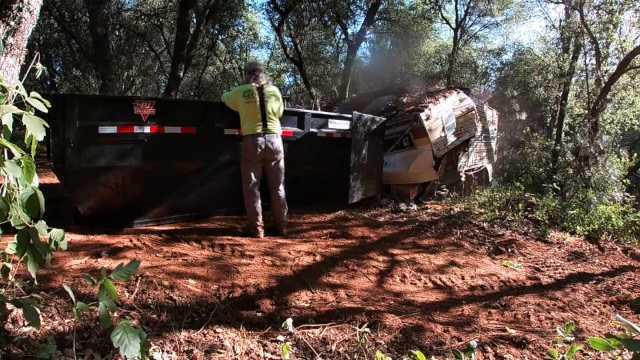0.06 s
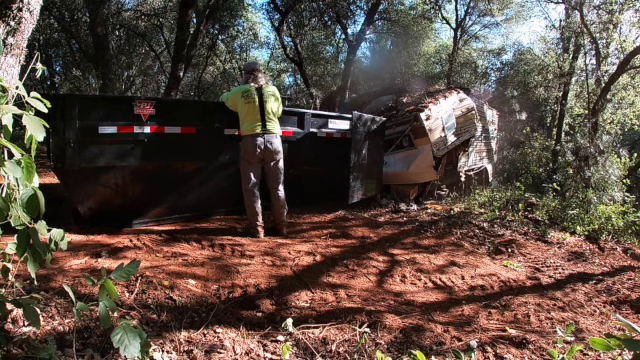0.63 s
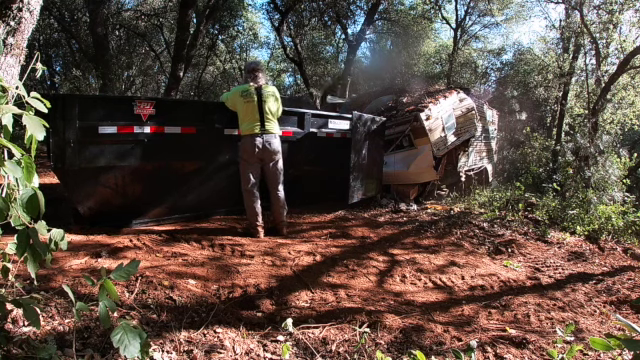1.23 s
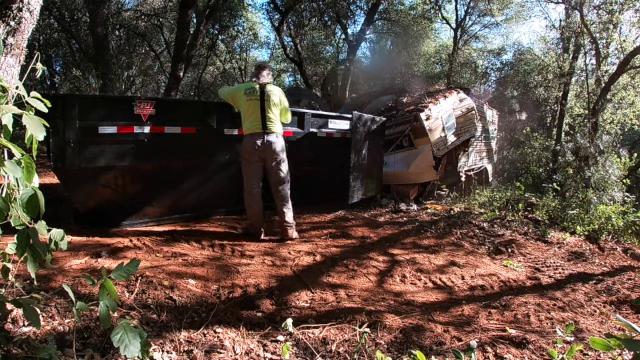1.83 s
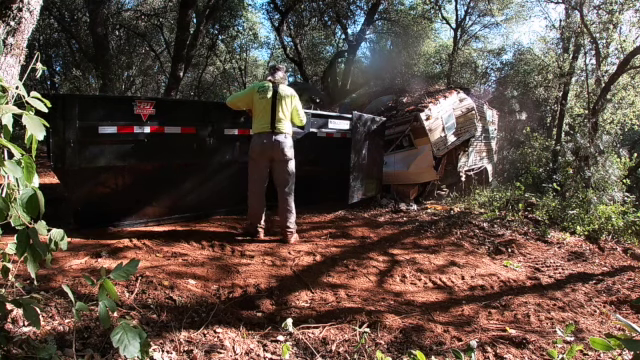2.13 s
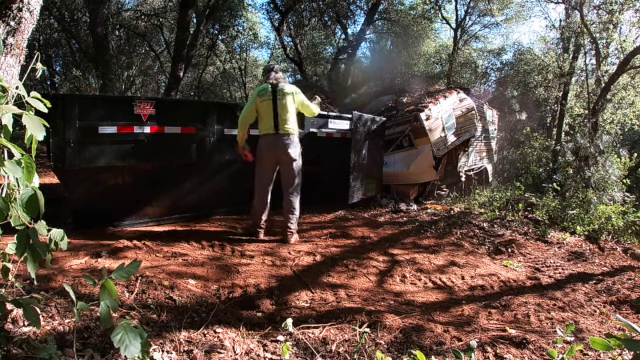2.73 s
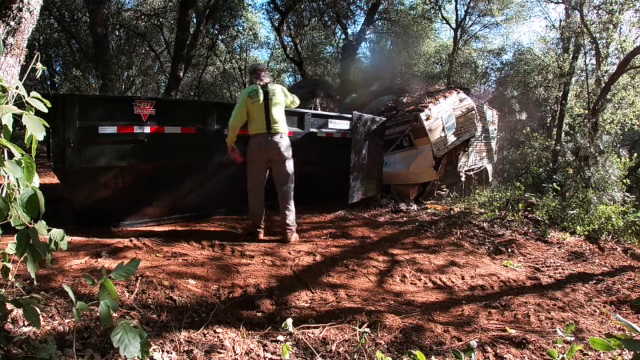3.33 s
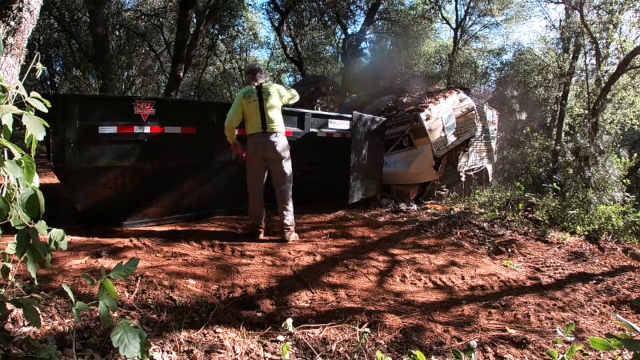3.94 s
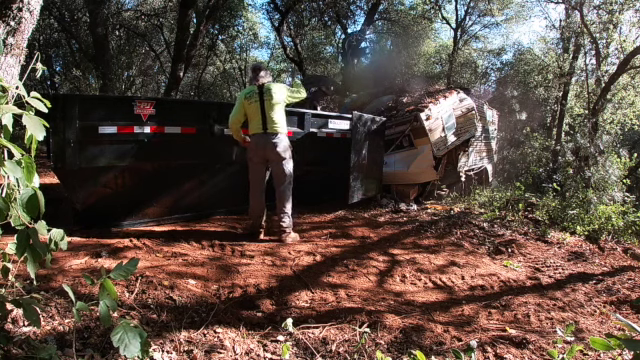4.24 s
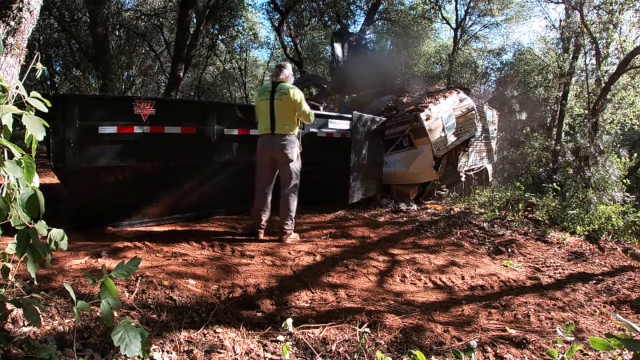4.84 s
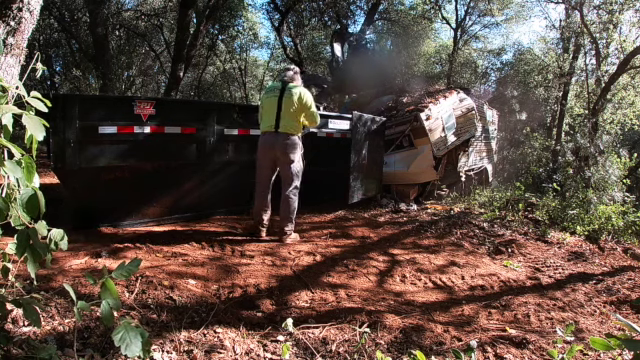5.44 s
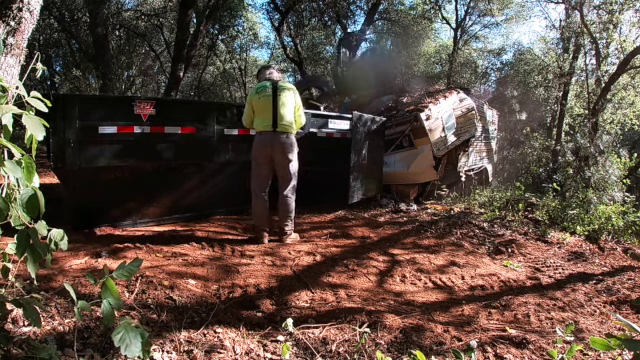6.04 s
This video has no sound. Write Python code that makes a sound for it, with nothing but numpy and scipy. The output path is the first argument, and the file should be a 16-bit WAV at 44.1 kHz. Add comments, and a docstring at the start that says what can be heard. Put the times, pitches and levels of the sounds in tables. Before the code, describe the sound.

The low, even drone of an excavator's diesel engine fills a wooded clearing, with soft hydraulic whines coming and going. A camper breaks up under it in separate bursts: small crunches and one sharp snap, then tearing timber and a wall caving in with a faint groan, and finally a run of crunching panels. Each break echoes briefly among the trees.

```python
"""In a forest clearing, a four-cylinder diesel excavator at working speed crushes a camper body.
Its exhaust booms at the firing rate, over an engine growl, diesel clatter and whining hydraulics.
Wooden studs crack, the timber frame tears, sheet panels crunch, walls cave in and the shell groans.
Most breaks are bursts of tiny snaps that make the wreck ring; the trees scatter every break."""
import sys
import numpy as np
from scipy import signal
from scipy.fft import rfft, irfft, next_fast_len
from scipy.io import wavfile
from scipy.ndimage import map_coordinates

SR = 44100
rng = np.random.default_rng(int(sys.argv[2]) if len(sys.argv) > 2 else 0)


def store_wav(level_fs):
    """Save 16-bit WAV to argv[1]."""
    pcm = np.round(np.clip(np.atleast_2d(level_fs), -1, 1) * 32767)
    wavfile.write(sys.argv[1], SR, pcm.T.astype(np.int16))


N = 272229


def amp(db):
    """Turn decibels into a gain."""
    return 10 ** (np.asarray(db) / 20)


def unit(x):
    """Scale a signal to an average (rms) level of 1."""
    return x / np.sqrt(np.mean(x ** 2) + 1e-20)


def along(points, hz):
    """Read between (Hz, value) points on a logarithmic frequency scale."""
    freqs, values = np.transpose(points)
    return np.interp(np.log(hz + 1), np.log(freqs), values)


def curve(points):
    """Join (seconds, value) points with straight lines, one value per sample."""
    return np.interp(np.arange(N) / SR, *np.transpose(points))


def wobble(rate):
    """A smooth curve through `rate` random points a second."""
    points = rng.standard_normal(int(N * rate / SR) + 4)
    return map_coordinates(points, [np.arange(N) * rate / SR])


def filtered(x, response):
    """Scale each frequency in x by the gain response(hz)."""
    size = next_fast_len(N + 8192)
    return irfft(rfft(x, size) * response(np.fft.rfftfreq(size, 1 / SR)), size)[:N]


def noise(spectrum, swell):
    """Noise shaped by (Hz, dB) points, growing and shrinking with `swell`; average level 1."""
    steady = filtered(rng.standard_normal(N), lambda hz: amp(along(spectrum, hz)))
    return unit(steady * np.exp(swell))


def add(out, start_s, sound):
    """Mix a sound in at a given time."""
    start = max(round(start_s * SR), 0)
    out[start:start + len(sound)] += sound[:max(N - start, 0)]


def exhaust(phase, firing_hz, load, pipe_hz=70.3):
    """The silencer leaves an almost pure tone at the firing rate; load brings out its octave."""
    detune_db = 1.25 * np.maximum(firing_hz - pipe_hz, 0)  # weaker above the pipe's tuning
    boom = amp(-12.7 - 0.65 * load - detune_db + 0.062 * wobble(14)) * np.cos(phase)
    octave_db = -54.5 + 15.5 * load + 0.49 * wobble(18)
    octave = amp(octave_db) * np.sin(2 * phase + rng.uniform(0, 2 * np.pi))
    return np.sqrt(2) * (boom + octave)


def growl(phase, load, boost_db=0.57, waver_db=1.5):
    """Unequal cylinders give tones at quarter steps of the firing rate; gears add a few more."""
    # Each row: multiple of the firing rate, relative dB at light load, relative dB at full load.
    tones = [(1.5, -57, -55), (3, -60, -58), (3.63, -62, -58), (4, -62, -66), (5.1, -69, -56),
             (5.44, -57.5, -55), (6.06, -56, -61), (7, -69, -57), (7.25, -67, -61), (7.5, -59, -54),
             (7.75, -63, -57), (8, -80, -58), (9, -64, -61), (8.5, -66, -64), (8.75, -62, -63),
             (9.75, -63, -66), (12, -72, -75), (13.5, -67.5, -66.5)]
    out = np.zeros(N)
    for multiple, light_db, full_db in tones:
        db = light_db + (full_db - light_db) * load + boost_db + waver_db * wobble(5.5)
        out += amp(db) * np.sin(multiple * phase + rng.uniform(0, 2 * np.pi) + 0.16 * wobble(11))
    return np.sqrt(2) * out


def engine_noise(phase, load):
    """The casing rumbles and the diesel clatters in time with the engine; load adds knock."""
    # The tone colours of the three noises. Each row: frequency in Hz, relative level in dB.
    casing_colour = [(20, -3.5), (50, -6), (100, 3.5), (135, 4.5), (175, -4.5), (280, -7), (430, -3.5),
                     (600, -8.5), (800, -11), (1100, -23), (2000, -36.5), (4000, -81)]
    clatter_colour = [(300, -28.5), (700, -1.5), (1000, 0.5), (1300, -2), (1550, -0.5), (1950, -3),
                      (2300, 1), (3000, -3), (3700, -10), (5800, -10), (7400, -12.5), (8100, -22),
                      (9000, -19.5), (11000, -39.5), (13000, -54)]
    knock_colour = [(400, -15), (950, -2.5), (1700, -4), (2300, -12), (5000, -30.5), (10000, -70.5)]
    # One swell per firing, one per shaft turn and one per four-stroke cycle.
    beat = 0.21 * np.cos(phase) + 0.13 * np.cos(phase / 2) + 0.01 * np.cos(phase / 4)
    rumble = amp(-46 + 3.5 * load + 0.22 * wobble(11)) * noise(casing_colour, beat)
    clatter = amp(-53 - load + 0.042 * wobble(23)) * noise(clatter_colour, 0.18 * beat)
    knock = amp(-57) * load * noise(knock_colour, beat)
    return rumble + clatter + knock


def pump(phase, waver_db=1.2):
    """The hydraulics whine in step with the engine, swelling and fading with each move of the arm."""
    # Each row: start, length and fade in seconds, multiple of the firing rate, level in dB,
    # flutter in radians.
    whines = [(-.6, 3.8, .7, 8, -52, .22), (-.1, 1.2, .3, 6, -50, .5), (1.1, .8, .3, 6, -52, .6),
              (0, 1.0, .42, 12, -57, .45), (1.9, .8, .35, 8.5, -54.5, .4), (2.15, 1.4, .5, 9, -54.8, .35),
              (2.7, .8, .3, 10, -60, .4), (2.7, .85, .25, 22, -66, 1.1), (3.15, .5, .15, 6, -54.5, .4),
              (3.9, .95, .3, 9, -56, .35), (4.1, .8, .3, 8, -55, .4), (4.7, 1.3, .15, 7, -55.5, .35),
              (5.5, .7, .25, 12, -56.5, .35), (5.65, .8, .3, 8, -54, .4)]
    t, out = np.arange(N) / SR, np.zeros(N)
    for start, length, fade, multiple, db, flutter in whines:
        swell = np.clip(np.minimum(t - start, start + length - t) / fade, 0, 1)
        cycle = multiple * phase + rng.uniform(0, 2 * np.pi) + flutter * wobble(19)
        out += swell * amp(db + waver_db * wobble(14)) * np.sin(cycle)
    return np.sqrt(2) * out


def ring(spectrum, bright_db, peaks=(), size=2048):
    """How a part rings after one tap. Each peak: pitch in Hz, height in dB, half width in octaves."""
    hz = np.fft.rfftfreq(size, 1 / SR)
    peaks_db = sum(db / (1 + (np.log2((hz + 1) / centre) / width) ** 2) for centre, db, width in peaks)
    tilt_db = bright_db * np.log2(np.maximum(hz, 700))
    cepstrum = irfft(np.log(amp(along(spectrum, hz) + tilt_db + peaks_db)))
    # Folding this onto its first half keeps the tone colour and puts all ringing after the tap.
    cepstrum[1:size // 2] *= 2
    cepstrum[size // 2 + 1:] = 0
    response = irfft(np.exp(rfft(cepstrum)))
    return response / np.linalg.norm(response)


def fracture(length, bright_db, piece_peaks, thud_db, first_snap, fibres_per_s=1100, ring_s=0.015):
    """One snap, then a run of fibres giving way: they ring the piece and wreck and shake the panel."""
    # The tone colours of splintering and of a panel's thud. Each row: frequency in Hz, relative dB.
    splinter_colour = [(150, -14), (500, -0.5), (900, -1), (1300, -1), (1700, 0), (2050, -5), (2450, -2.5),
                       (2900, -3), (3900, -6.5), (4700, -9.5), (6000, -10), (7300, -13), (8000, -21),
                       (9500, -24.5), (11500, -40), (15000, -52.5)]
    thud_colour = [(60, -29.5), (140, 3.5), (290, 4), (480, -1.5), (780, -5), (1200, -12), (2200, -22),
                   (6000, -57)]
    # The wreck's own resonances. Each row: pitch in Hz, height in dB.
    wreck_modes = [(1200, 1.5), (2680, 1.5), (5300, 1.5), (7000, 1), (8700, 2.5)]
    t = np.arange(SR // 4) / SR
    gives_way = (rng.random(len(t)) < fibres_per_s / SR) & (t < length)
    snaps = gives_way * amp(4 * rng.standard_normal(len(t))) * rng.choice([-1, 1], len(t))
    snaps[0] = first_snap
    peaks = [(hz, db, 0.093) for hz, db in wreck_modes] + piece_peaks
    body = ring(splinter_colour, bright_db, peaks) + amp(thud_db) * ring(thud_colour, 0)
    sound = signal.fftconvolve(signal.fftconvolve(snaps, body), scatter())
    energy = (length + ring_s) * SR * np.sum(body ** 2)  # a longer tear releases more energy
    return sound * np.sqrt(energy / np.sum(sound ** 2))


def studs(rise_s=0.00047, tip_fade_s=0.0069, scatter_db=-11):
    """A wooden stud parts all at once: its tip splinters and it rings for a few milliseconds."""
    # Each row: start in seconds, relative level in dB, brightness in dB per octave.
    cracks = [(1.2875, -18.5, -1), (1.673, -44.5, 9), (3.6102, -23, 2), (3.7328, -29, 6)]
    # A stud's ringing tones. Each row: pitch in Hz, relative level in dB, seconds to fade by 60 dB.
    stud_modes = [(2750, -12.5, .008), (3830, -6, 0.0069), (5760, -2, 0.0073), (6460, -3.5, 0.0064),
                  (8800, -25.5, 0.0045)]
    t, out = np.arange(SR // 20) / SR, np.zeros(N)
    for start, db, bright_db in cracks:
        ringing = np.zeros(len(t))
        for hz, mode_db, fade_s in stud_modes:
            decay = amp(mode_db + bright_db * np.log2(hz / 5800) - 60 * t / fade_s)
            ringing += decay * np.sin(2 * np.pi * (hz * t + rng.random()))
        tip = amp(-12.5 - 60 * t / tip_fade_s) * rng.standard_normal(len(t))
        tip = signal.lfilter(*signal.butter(2, 7000, fs=SR), tip)
        crack = amp(db) * (ringing + tip) * (1 - np.exp(-t / rise_s))
        add(out, start, crack)
        add(out, start, amp(scatter_db) * signal.fftconvolve(crack, scatter()))
    return out


def framing(spray_delay_s=0.015, spray_s=0.06, spray_db=-18.5, octaves=0.31):
    """Timber tears fibre by fibre, and a spray of splinters follows; thin pieces give off no bass."""
    # Each row: start in seconds, level in dB, tearing time in seconds, brightness in dB per octave,
    # the piece's resonance in Hz, its height in dB, bass cutoff in Hz.
    tears = [(0.191, -50, 0.059, 1, 3300, 2, 500), (1.177, -53, 0.0039, 5.5, 9000, 13.5, 6000),
             (1.18, -43, 0.013, -0.5, 2970, 7, 2500), (1.251, -56.5, 0.0053, -5, 2470, 8, 1500),
             (1.289, -36.5, 0.018, 0.2, 4900, 6, 600), (1.316, -47, .03, 0, 5200, 6, 1000),
             (1.345, -54, 0.057, 1, 5200, 8, 2000), (1.673, -55.5, 0.006, 9, 10500, 4.5, 2500),
             (1.713, -49, 0.04, 0, 6900, 8, 600), (2.12, -60.5, .007, 6, 10900, 5.5, 2500),
             (2.378, -48.5, 0.019, 0.5, 4000, 2.5, 600), (2.523, -53, 0.0089, 2, 9150, 5, 800),
             (3.612, -40, 0.0095, -1, 2610, 3.5, 500), (3.622, -38.3, 0.043, 3, 7000, 0.5, 500),
             (3.685, -46.5, 0.049, 2, 4170, 3.5, 800), (3.733, -33.5, 0.013, 3.5, 5950, 5, 800),
             (3.738, -35, 0.018, 0, 2810, 8, 900), (3.92, -51, 0.099, -1.5, 6000, 3.5, 500),
             (3.975, -51.5, 0.049, 6.5, 3880, 3, 800), (4.535, -53, 0.031, 9, 6500, 5.5, 1500)]
    out = np.zeros(N)
    for start, db, length, bright_db, piece_hz, peak_db, cutoff_hz in tears:
        bass_cut = signal.butter(2, cutoff_hz, "high", fs=SR)
        snap = fracture(length, bright_db, [(piece_hz, peak_db, octaves)], thud_db=-18, first_snap=3.5)
        spray = fracture(spray_s, bright_db, [(5800, 5, octaves)], thud_db=-18, first_snap=0.99)
        add(out, start, amp(db) * signal.lfilter(*bass_cut, snap))
        add(out, start + spray_delay_s, amp(db + spray_db) * signal.lfilter(*bass_cut, spray))
    return out


def panels(hard_crunch_db=-35):
    """Each sheet rings at its own pitches as it crunches; the harder the crunch, the more it thuds."""
    # Each row: start in seconds, level in dB, tearing time in seconds, brightness in dB per octave,
    # the sheet's lowest resonance in Hz, a base height in dB for its resonances.
    crunches = [(0.005, -50, .15, 0, 2250, 3.5), (0.755, -45, 0.045, -2.5, 2110, 10.5),
                (0.826, -47, 0.04, -2, 2220, 5), (0.88, -56, 0.16, 1, 2300, 12),
                (3.473, -48.5, 0.023, -2.5, 2500, 5), (4.396, -54, 0.049, 0.5, 2400, 5),
                (5.115, -51, 0.013, -9.5, 1850, 9.5), (5.216, -53.5, 0.039, -1.5, 2900, 5),
                (5.387, -47, 0.02, -2, 2650, 10.5), (5.414, -44.5, 0.049, -2.5, 2630, 11),
                (5.584, -50, 0.017, -2.5, 3100, 4), (5.649, -50.5, 0.015, -0.5, 2800, 6),
                (5.774, -51.5, 0.034, -2.5, 2700, 9.5), (5.957, -48.5, 0.039, 1, 2680, 15),
                (5.996, -34.5, 0.019, -0.5, 2540, 13.5), (6.144, -38.5, 0.021, -1, 2650, 13)]
    # A sheet's resonances. Each row: ratio to the lowest, share of base height, half width in octaves.
    sheet_modes = [(1, .75, .11), (1.16, .55, .09), (1.53, .45, .09), (2.05, .12, .07), (2.72, .35, .07)]
    out = np.zeros(N)
    for start, db, length, bright_db, sheet_hz, base_db in crunches:
        thud_db = 0.5 + 0.65 * (db - hard_crunch_db)
        peaks = [(ratio * sheet_hz, share * base_db, width) for ratio, share, width in sheet_modes]
        add(out, start, amp(db) * fracture(length, bright_db, peaks, thud_db, first_snap=3.8))
    return out


def walls(bright_db=-3.5, octaves=0.21):
    """Around the biggest breaks a wall gives way, dull and with a softer start."""
    # Each row: start in seconds, level in dB, length in seconds, resonance in Hz, its height in dB.
    cave_ins = [(1.291, -49, 0.032, 1300, 6), (3.623, -41, 0.041, 720, 7), (3.644, -43, 0.064, 950, 4),
                (3.739, -45.5, 0.027, 900, 1), (3.809, -43.5, 0.027, 850, 9), (3.846, -47.5, .04, 1120, 9),
                (5.958, -42, .035, 320, 15), (6.007, -42, 0.025, 620, 9), (6.035, -42.5, 0.007, 1200, 8)]
    out = np.zeros(N)
    for start, db, length, wall_hz, peak_db in cave_ins:
        rumble = fracture(length, bright_db, [(wall_hz, peak_db, octaves)], thud_db=1, first_snap=1.9)
        add(out, start, amp(db) * rumble)
    return out


def groan(centre_hz=256, width_hz=62):
    """As the arm bears down, the camper's shell rubs and drones in one low resonance."""
    # Each row: time in seconds, level in dB.
    levels = [(2.3, -65.5), (3.1, -53), (3.85, -50.5), (4.4, -59), (5, -67.5)]
    drone = filtered(rng.standard_normal(N), lambda hz: 1 / (1 + (2 * (hz - centre_hz) / width_hz) ** 2))
    return amp(curve(levels)) * unit(drone)


def scatter(near_fade_s=0.13, near_db=6, forest_db=2):
    """A break's echoes: quick ones off the wreck and a steel bin, longer ones from the trees."""
    # Each row: frequency in Hz, seconds for the forest's echo to fade by 60 dB.
    forest_fades = [(150, 0.87), (1000, 0.61), (3000, 0.55), (7000, 0.62), (12000, 0.91)]
    t = np.arange(SR * 3 // 4) / SR
    lumpy_noise = rng.standard_normal(len(t)) * np.exp(0.55 * rng.standard_normal(len(t)))
    near = lumpy_noise * amp(-60 * t / near_fade_s)
    hz, seconds, bands = signal.stft(rng.standard_normal(len(t)), SR, nperseg=256)
    decay = amp(-60 * seconds / along(forest_fades, hz)[:, None])
    far = signal.istft(bands * decay, SR, nperseg=256)[1][:len(t)]
    path = amp(near_db) * near / np.linalg.norm(near) + amp(forest_db) * far / np.linalg.norm(far)
    path[0] += 0.8  # the direct sound
    return path / np.linalg.norm(path)


def scene():
    """The crankshaft drives every engine layer; the wreck breaks beside it."""
    # Engine speed. Each row: time in seconds, firings per second.
    speeds = [(0, 70.7), (1.98, 70.35), (2.24, 69.8), (2.43, 70.5), (2.87, 70.3), (3.33, 68.7),
              (3.47, 68.8), (3.62, 69.8), (4.05, 70.6), (4.3, 70.0), (4.65, 69.9), (4.87, 71.8),
              (5.23, 72.6), (5.78, 71.9), (5.95, 72.0), (6.08, 70.5)]
    # Hydraulic load. Each row: time in seconds, load from 0 (light) to 1 (full).
    loads = [(0, 0.17), (2.7, 0.12), (3.45, 0.11), (3.65, 0.7), (4.4, 0.77)]
    firing_hz, load = curve(speeds), curve(loads)
    phase = 2 * np.pi * np.cumsum(firing_hz) / SR  # one cycle per firing
    machine = exhaust(phase, firing_hz, load) + growl(phase, load)
    machine += pump(phase) + engine_noise(phase, load)
    return (machine + groan() + studs() + framing() + panels() + walls())[None]


def record(dry, top_hz=14600):
    """A steep filter cuts the highest treble."""
    return signal.sosfilt(signal.butter(12, top_hz, fs=SR, output="sos"), dry)


dry = scene()
out = record(dry)
store_wav(out)
```